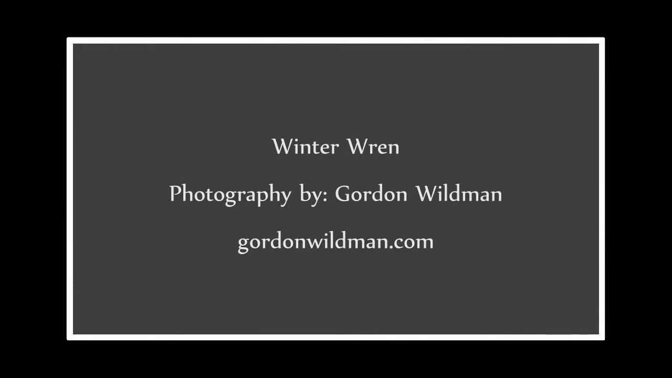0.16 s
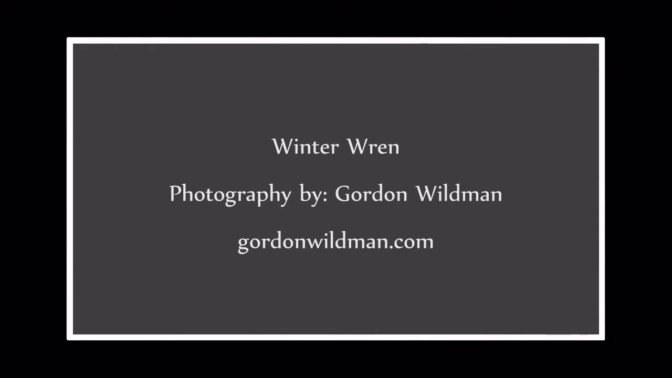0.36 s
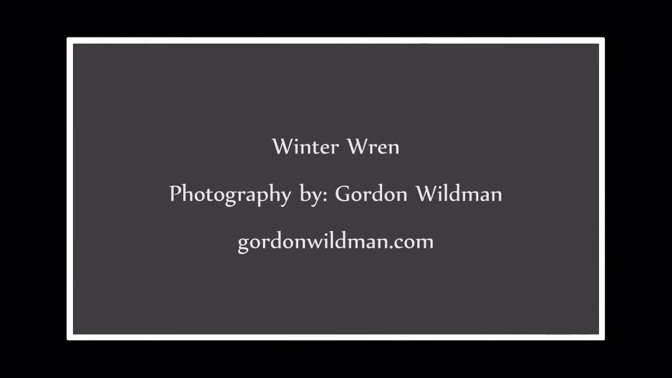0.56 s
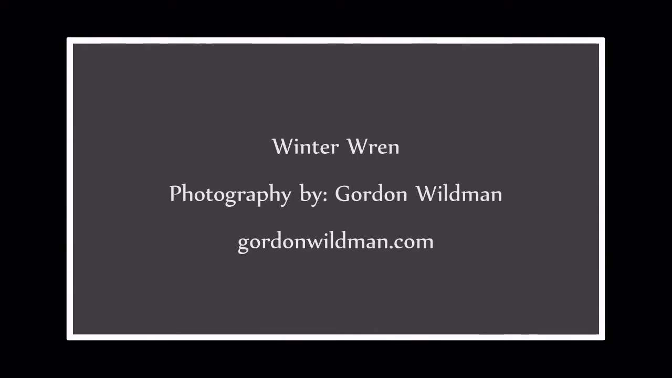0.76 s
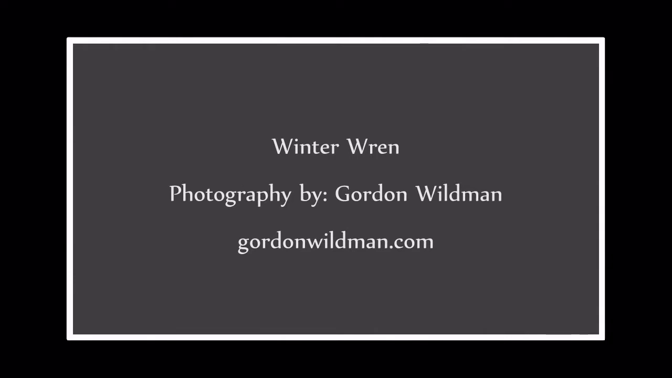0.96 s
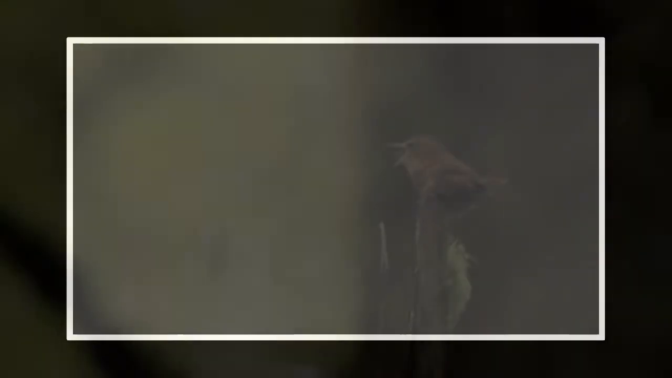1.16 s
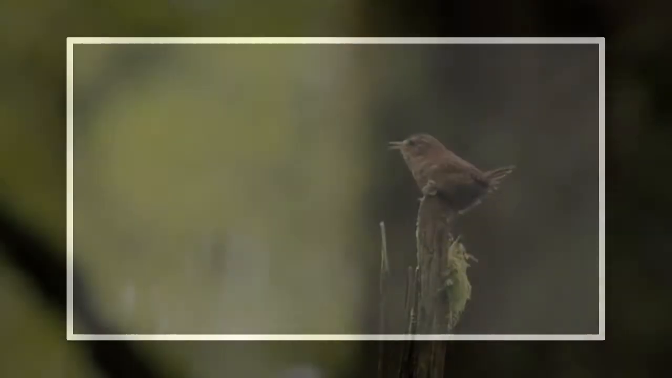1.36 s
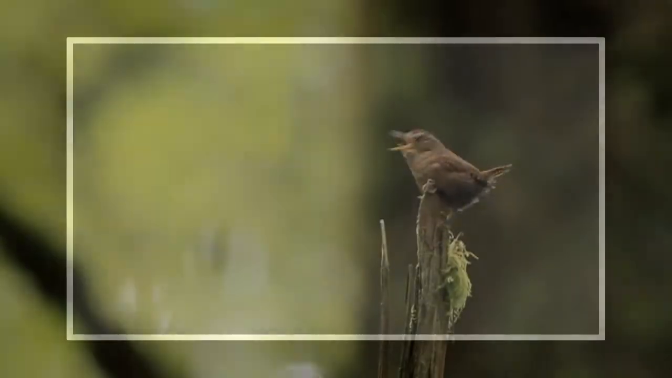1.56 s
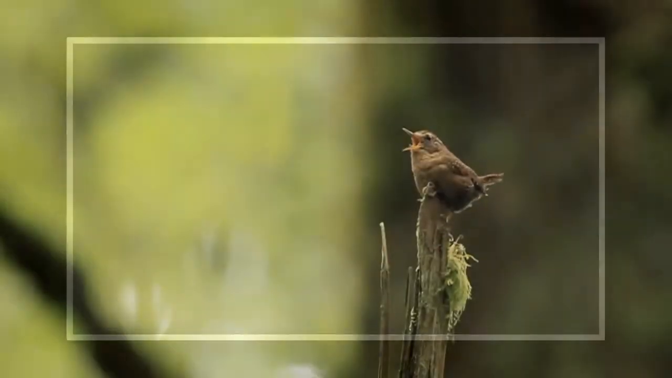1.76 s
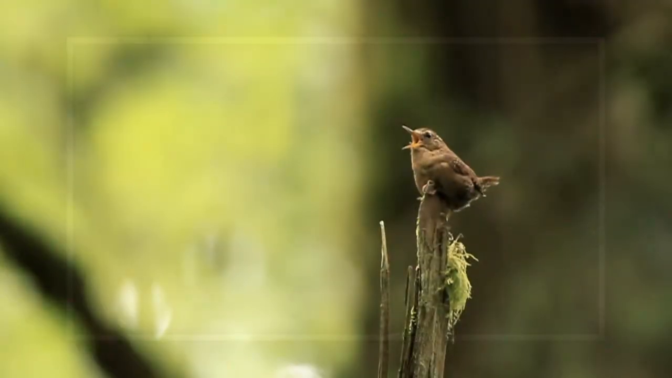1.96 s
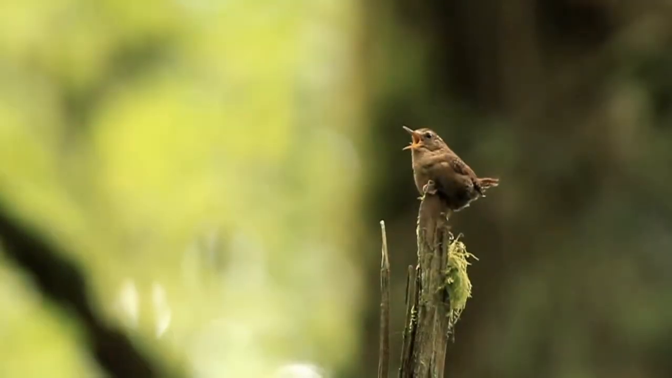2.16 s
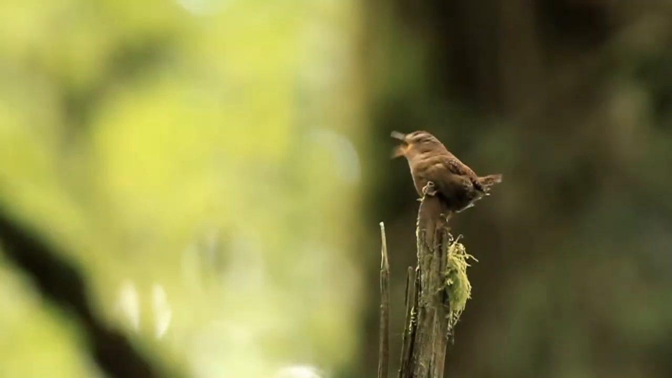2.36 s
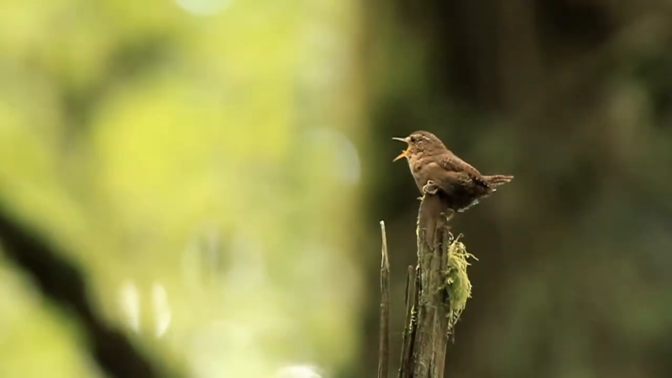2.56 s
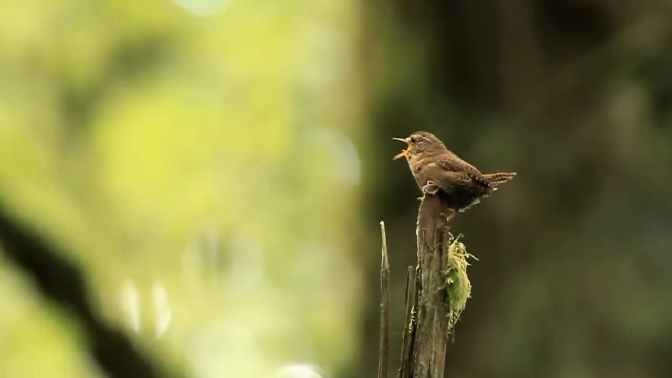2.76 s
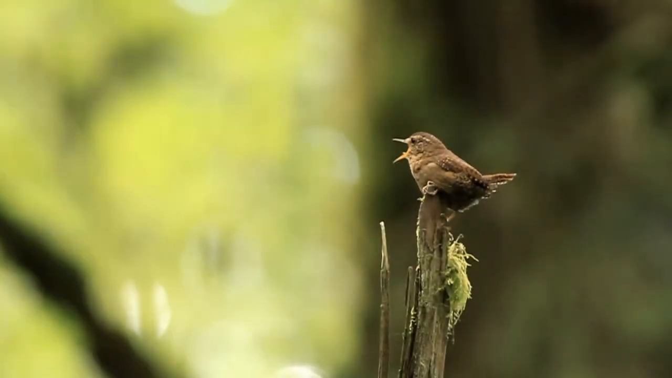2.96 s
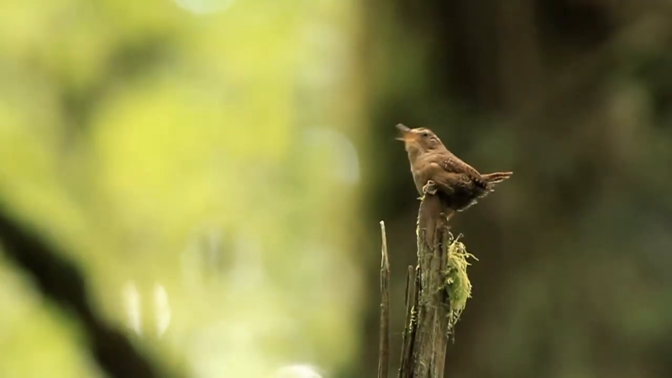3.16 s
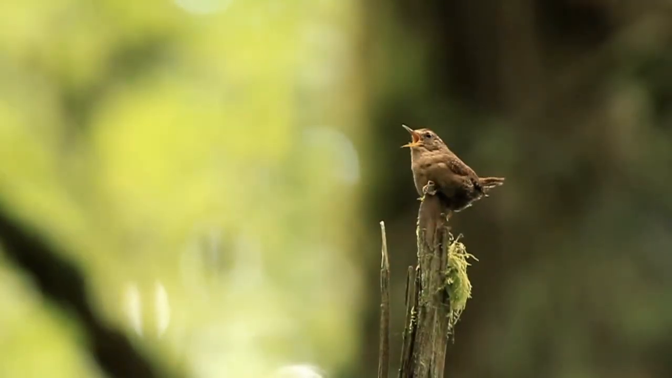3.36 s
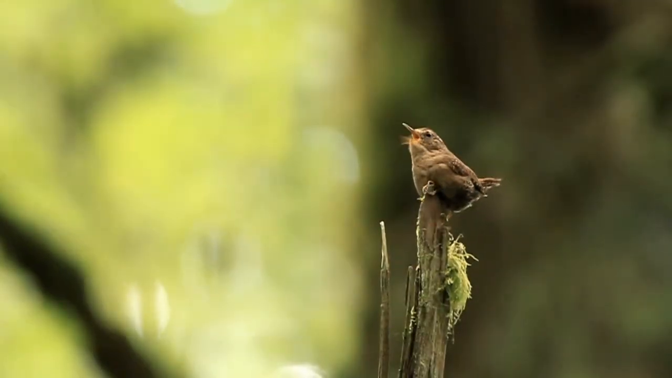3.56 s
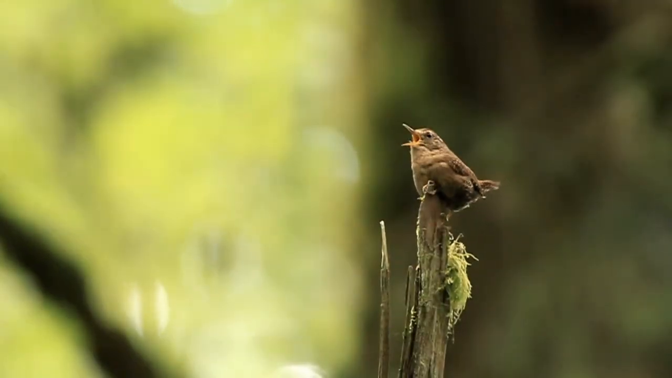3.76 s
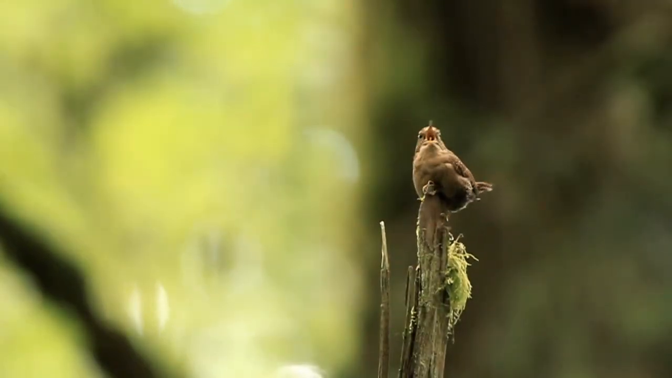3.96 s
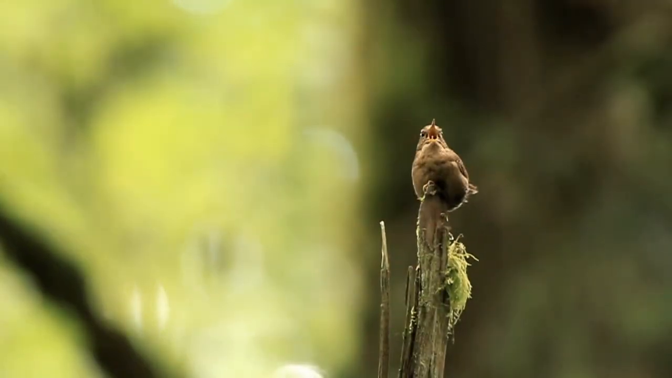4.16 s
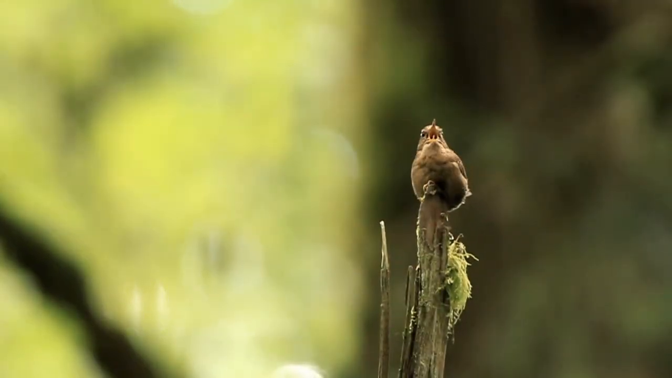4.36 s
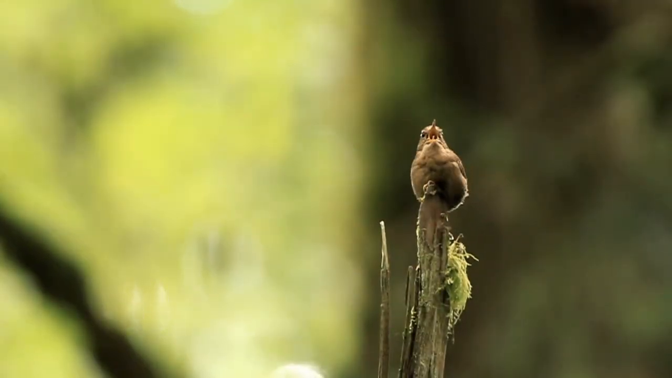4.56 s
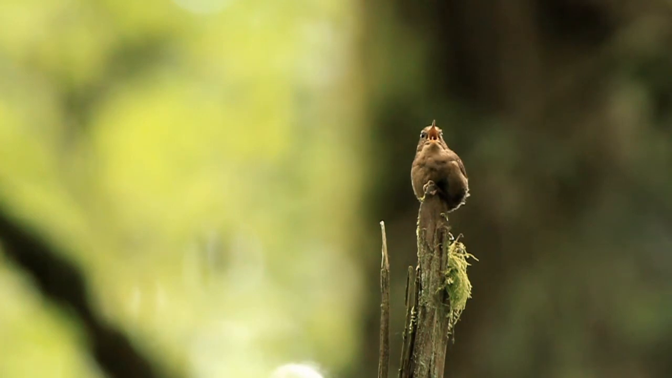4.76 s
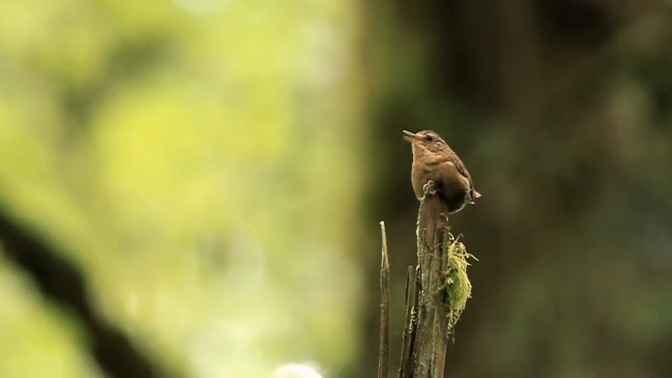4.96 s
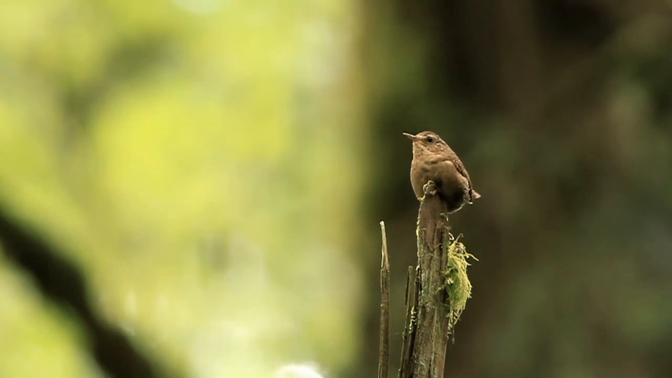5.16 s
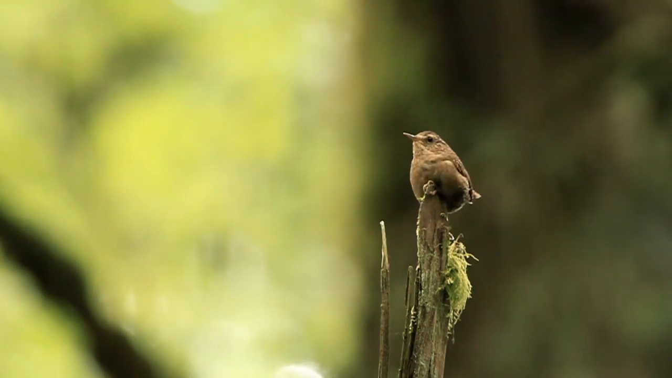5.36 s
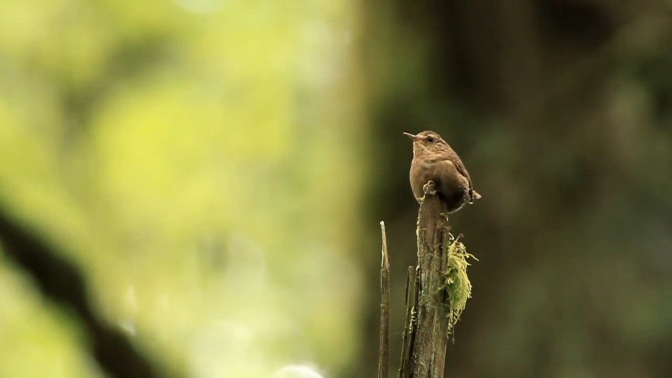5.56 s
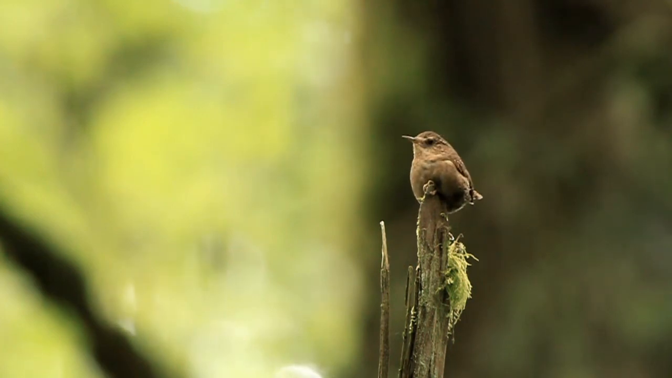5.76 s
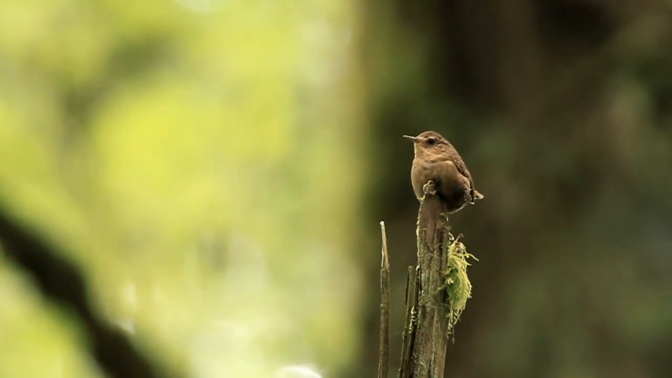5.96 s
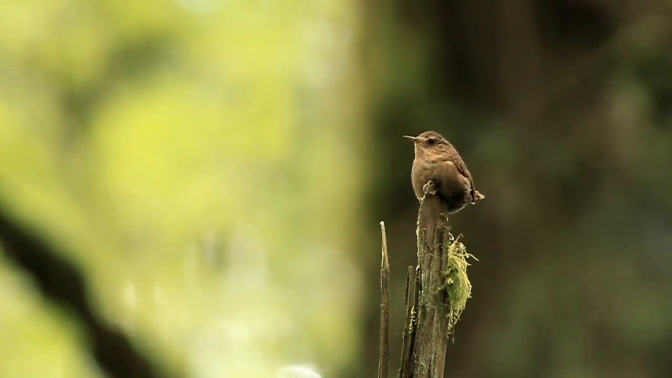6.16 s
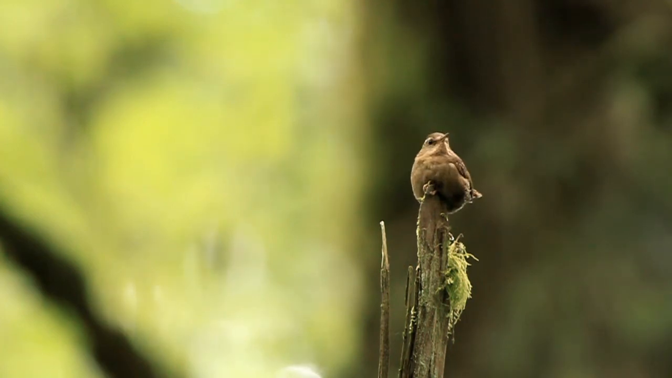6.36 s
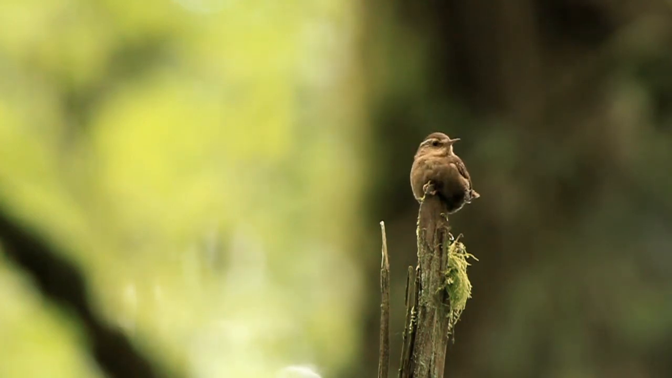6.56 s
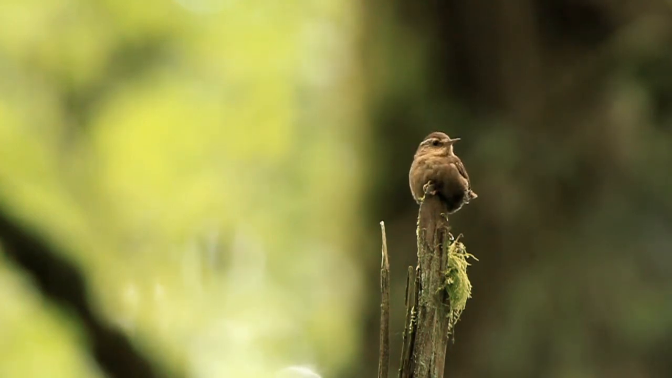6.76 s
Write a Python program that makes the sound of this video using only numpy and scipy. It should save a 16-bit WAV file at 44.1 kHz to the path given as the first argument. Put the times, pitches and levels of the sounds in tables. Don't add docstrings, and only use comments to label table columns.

```python
import sys
import numpy as np
from scipy import signal
from scipy.fft import rfft, irfft
from scipy.io import wavfile
from scipy.ndimage import uniform_filter1d, minimum_filter1d

SR = 44100
rng = np.random.default_rng(int(sys.argv[2]) if len(sys.argv) > 2 else 0)


def volts(x):
    e = np.asarray(x, float) / 20
    return 10 ** e


def transcribe(u):
    v = np.clip(np.atleast_2d(u).T, -1, 1)
    q = np.round(v * 32767).astype(np.int16)
    wavfile.write(sys.argv[1], SR, q)


N = 300071
CUT_S, TOP_HZ = .9878, 15780


def rms_one(x):
    return x / np.sqrt(np.mean(x ** 2) + 1e-20)


def band(x, low_hz, high_hz, order=2):
    return signal.sosfilt(signal.butter(order, [low_hz, high_hz], "band", fs=SR, output="sos"), x)


def drift(rate_hz):
    r = np.exp(-2 * np.pi * rate_hz / SR)
    noise = rng.standard_normal(N + 20000)
    return rms_one(signal.lfilter([1], [1, -2 * r, r * r], noise)[20000:])


# (f/Hz, level/dB)
LOW_TONES = [(86, -65.5), (129, -74.5)]


def held_offset():
    t = np.arange(N) / SR
    held = .1107 + sum(volts(db) * np.sin(2 * np.pi * hz * t) for hz, db in LOW_TONES)
    return held * [[0], [1]]


def joined(glides):
    notes = []
    for g in sorted(glides):
        last = notes[-1][-1] if notes else (0, 0, 0, 0, 0, 0)
        gap_s, leap_hz = g[0] - last[0] - last[1], abs(g[2] - last[4])
        turn = last[2] - last[4] > 1500 and g[4] - g[2] > 1500
        if gap_s < .0035 and leap_hz < 900 and not turn:
            notes[-1].append(g)
        else:
            notes.append([g])
    return notes


def breath_pulse(pitch, gain, note, fade_s):
    pad = int(0.00082 * SR)
    a = int(note[0][0] * SR) - pad
    b = int((note[-1][0] + note[-1][1]) * SR) + pad
    t = np.arange(a, b) / SR
    u = np.linspace(0, 1, 9)
    times = np.concatenate([s + u * length for s, length, *_ in note])
    bows = np.concatenate([f0 * (1 - u) * (1 - 2 * u) + 4 * f1 * u * (1 - u) + f2 * u * (2 * u - 1)
                           for _, _, f0, f1, f2, _ in note])
    level_db = np.interp(t, [s + length / 2 for s, length, *_ in note], [g[-1] for g in note])
    span_s = t[-1] - t[0]
    fade_out_s = min(fade_s, span_s / 2)
    swell_s = min(max(2.58 * fade_s, min(0.04 * span_s, .016)), span_s / 2)
    ramp = np.minimum((t - t[0]) / swell_s, (t[-1] - t) / fade_out_s)
    ends = np.sin(np.pi / 2 * np.clip(ramp, 0, 1)) ** 2
    line = np.interp(t, np.maximum.accumulate(times), bows)
    pitch[a:b] = uniform_filter1d(line, size=70, mode="nearest")
    gain[a:b] = np.maximum(gain[a:b], volts(level_db) * ends)


def whistle(notes, fade_s, second_db, third_db, flutter_db, waver_hz, loss_db):
    pitch, gain = np.full((2, N), 5000.), np.zeros((2, N))
    for k, note in enumerate(sorted(notes)):
        breath_pulse(pitch[k % 2], gain[k % 2], note, fade_s)
    phase = 2 * np.pi * np.cumsum(pitch + waver_hz * drift(147), axis=1) / SR
    ragged = volts(3.7 * drift(300))

    def overtone(k, db):
        growth = volts(1.6 * (k * pitch - 13000) / 1000)
        below_top = np.clip((TOP_HZ + 150 - k * pitch) / 250, 0, 1)
        return volts(db) * ragged * below_top * growth * np.sin(k * phase)

    throat_loss = volts(loss_db * np.minimum(pitch - 4300, 0) / 1000)
    tone = np.sin(phase) * throat_loss + overtone(2, second_db) + overtone(3, third_db)
    return (gain * tone).sum(axis=0) * volts(flutter_db * drift(120))


def wren():
    notes = joined(free_glides() + plunges() + trills() + end_figures()) + buzzes()
    return whistle(notes, fade_s=0.0029, second_db=-32.0, third_db=-45, flutter_db=1.4,
                   waver_hz=26.5, loss_db=2.5)


# (t/s, length/s, f/Hz, level/dB)
HOLDS = [(1.062, 0.0062, 6080, -16.5), (1.3382, 0.022, 3205, -21), (1.3772, 0.0055, 3520, -17.5),
         (2.36, 0.039, 7072, -16), (2.399, 0.013, 7500, -22.5), (1.052, .004, 6050, -21),
         (1.105, 0.007, 6800, -12.5), (1.116, 0.0069, 7900, -24), (3.371, 0.011, 7620, -12),
         (4.162, 0.009, 7440, -23), (1.427, 0.016, 6200, -11.5), (1.512, 0.018, 3890, -20.5),
         (2.817, 0.037, 7840, -15.5), (3.073, 0.015, 4100, -17), (4.037, .009, 6525, -22),
         (4.117, 0.0097, 7640, -12.5)]
# (t/s, length/s, start f/Hz, end f/Hz, level/dB)
RISES = [(1.113, 0.0089, 6830, 7850, -22), (1.227, 0.0087, 6740, 7490, -18),
         (1.407, 0.028, 5180, 6150, -16.5), (1.443, 0.013, 6240, 7440, -18), (1.473, 0.01, 6065, 7200, -33),
         (1.5443, 0.022, 4520, 5610, -15.5), (1.6005, 0.0068, 3900, 4800, -19),
         (2.264, 0.024, 4010, 4650, -12), (2.286, .009, 4636, 4745, -12),
         (1.8525, 0.014, 7600, 7910, -11.5), (2.923, 0.011, 6400, 7700, -23.5),
         (2.802, 0.014, 7200, 7820, -22), (2.851, 0.013, 7830, 8260, -22.5),
         (3.0345, 0.0051, 3990, 4800, -19), (2.945, 0.0069, 5666, 7170, -14),
         (2.972, 0.012, 6280, 7300, -19), (3.1995, 0.0079, 5150, 5780, -15.5),
         (3.277, .017, 5350, 5500, -40), (3.2086, 0.015, 5780, 6790, -9.5),
         (3.330, 0.0115, 6480, 8460, -23), (3.5766, 0.012, 4533, 5270, -12.5),
         (3.6095, 0.016, 6250, 8970, -19), (3.649, 0.011, 7320, 7720, -18),
         (4.0365, 0.0045, 5000, 6560, -14), (4.101, 0.021, 6630, 7620, -12)]
FALLS = [(.935, 0.031, 8300, 6850, -13), (1.5655, 0.0042, 5250, 3940, -17.5),
         (1.574, .005, 5056, 3680, -13), (1.5835, 0.0049, 4090, 3040, -19.5),
         (1.593, 0.00425, 4373, 3350, -23), (.982, 0.012, 8100, 7460, -23.5),
         (.9965, 0.014, 7250, 5980, -19), (1.0115, 0.017, 5850, 4170, -15.5),
         (1.795, 0.012, 7600, 6930, -12), (1.8085, 0.0065, 6950, 4920, -15),
         (1.8835, 0.029, 8640, 7330, -14.5), (1.127, 0.015, 7850, 6250, -16.5),
         (1.145, 0.022, 6250, 4200, -14), (1.235, 0.0063, 7450, 6800, -18.5),
         (1.2828, 0.016, 6710, 5300, -15), (1.2998, 0.0128, 5285, 4316, -16),
         (1.455, 0.00954, 7416, 6895, -20.5), (1.465, 0.007, 6690, 5660, -16.5),
         (1.607, 0.00806, 4740, 4600, -16.5), (1.642, 0.0055, 8570, 7900, -19),
         (2.2187, 0.01195, 4198, 3748, -14), (2.295, 0.02, 4800, 4220, -14),
         (2.412, 0.013, 7460, 6370, -17), (2.9385, 0.0055, 7600, 5650, -15),
         (2.96, 0.0097, 7230, 6510, -15.5), (2.985, 0.028, 7280, 6550, -19),
         (3.038, 0.014, 4770, 3830, -20.5), (3.089, 0.0094, 4060, 3330, -22),
              (3.066, 0.0035, 4950, 4130, -20), (3.114, 0.013, 4190, 3400, -20.5),
              (3.154, 0.023, 3840, 3390, -25.5), (3.2235, 0.02, 6760, 4650, -12.5),
              (3.306, 0.0038, 6280, 5450, -16), (3.34, 0.013, 8450, 6920, -13.5),
              (3.404, .008, 4480, 4330, -25), (3.413, 0.008, 4330, 3800, -13.5),
              (3.548, 0.017, 4850, 4060, -10.5), (3.571, 0.00401, 4080, 3500, -19),
              (3.5414, 0.003, 5310, 4080, -14), (3.63, 0.015, 9050, 7380, -16),
              (3.6726, 0.0031, 7850, 6800, -18), (4.049, 0.0097, 6464, 5280, -7),
              (4.059, 0.014, 5340, 4580, -17), (4.13, 0.018, 7510, 6060, -16.5),
              (4.166, 0.011, 7150, 6420, -17.5)]
ARCHES = [(1.090, 0.01176, 7050, 6900, -19.5), (1.188, 0.0076, 5890, 6270, -17.5),
          (1.199, 0.0076, 6320, 6520, -19.5), (1.8185, 0.01, 4650, 7450, -8),
          (2.355, 0.0038, 5850, 6910, -19), (2.4711, 0.0059, 5620, 5360, -14.5),
          (1.778, 0.010, 4800, 7860, -15), (1.789, 0.0056, 7730, 7710, -21),
          (2.867, 0.031, 8120, 6367, -20), (3.0575, 0.011, 4100, 4870, -10.5),
          (3.1312, 0.009, 3510, 4790, -16), (3.1404, 0.0089, 4670, 3900, -15.5),
          (3.263, 0.011, 5165, 5300, -13), (3.2956, 0.0067, 5420, 6250, -13.5),
          (3.535, 0.0038, 4040, 5300, -12), (3.5392, 0.0038, 5280, 5190, -8.5),
          (3.6605, 0.016, 7440, 7900, -10)]
CUPS = [(1.2429, 0.017, 6950, 8360, -21.5), (1.2604, .0224, 8436, 6740, -18.5),
        (1.363, 0.011, 3050, 3154, -28), (1.495, 0.015, 4815, 3950, -16), (1.6485, .015, 7790, 8600, -15.5),
        (1.665, .005, 8600, 8430, -16.5), (1.864, .017, 7910, 8460, -19.5), (2.232, 0.017, 3798, 3740, -21),
        (2.4472, .026, 5280, 5530, -15), (3.2457, .017, 4597, 5105, -16.5),
        (3.3545, .018, 7010, 7390, -18.5)]


def free_glides():
    glides = [(s, length, hz, hz, hz, db) for s, length, hz, db in HOLDS]
    shapes = ((RISES, 39.2), (FALLS, 72.7), (ARCHES, 311), (CUPS, -300))
    for rows, bow_hz in shapes:
        glides += [(s, length, f0, (f0 + f1) / 2 + bow_hz, f1, db) for s, length, f0, f1, db in rows]
    return glides


# (echo level/dB, t60 of lows/s, t60 of highs/s)
WOOD = [
    (-12.5, 0.1, 0.063),
    (-12.5, 0.99, 0.55),
]


def wood(x):
    t = np.arange(SR) / SR
    clumps_db = 2.5 * rng.standard_normal(SR // 100).repeat(100)
    trunks = rng.standard_normal(SR) * volts(clumps_db)
    trunks = rms_one(signal.sosfilt(signal.butter(1, 12000, fs=SR, output="sos"), trunks))
    lows = signal.sosfiltfilt(signal.butter(2, 5500, fs=SR, output="sos"), trunks)
    highs = trunks - lows

    def dying(t60_s):
        return np.sqrt(2 * np.log(1000) / (t60_s * SR)) * volts(-60 * t / t60_s)

    echoes = sum(volts(db) * (lows * dying(low_s) + highs * dying(high_s)) for db, low_s, high_s in WOOD)
    return signal.fftconvolve(x, echoes * np.clip(t / 0.0013, 0, 1))[:N]


# (f/Hz, level/dB per Hz)
AIR = [(15, -44), (30, -12.5), (190, -3.5), (600, -9), (2400, -10.5), (4200, -15.5), (7000, -24),
       (13000, -27)]
# (t/s, depth/dB)
DUCKS = [(2.295, 4), (3.55, 0.5), (4.06, 2), (4.797, 1), (5.8, 1.5)]


def air():
    hz = np.clip(np.fft.rfftfreq(N, 1 / SR), 10, 12600)
    points_hz, points_db = np.transpose(AIR)
    shape_db = np.interp(np.log(hz), np.log(points_hz), points_db)
    hiss = irfft(rfft(rng.standard_normal(N)) * volts(shape_db), N)
    t, recovery_s = np.arange(N) / SR, 0.35
    ducked_db = sum(db * (t > s) * np.exp(-np.abs(t - s) / recovery_s) for s, db in DUCKS)
    return rms_one(hiss) * volts(-44.5 - ducked_db + .5 * drift(13.0))


# (t/s, level/dB)
SWELLS = [(1.1, -42), (2.93, -43), (3.48, -40), (4.4, -52), (5.321, -46), (5.9, -38), (6.1, -42),
          (6.3, -39.5), (6.55, -55)]


def rumble():
    t, swell_s = np.arange(N) / SR, 0.066
    level = volts(-50) + sum(volts(db) * np.exp(-.5 * ((t - s) / swell_s) ** 2) for s, db in SWELLS)
    return rms_one(band(rng.standard_normal(N), 130, 231)) * level * volts(-14.0 + 2.0 * drift(2.4))


# (t/s, peak level/dB)
TICKS = [
    (1.0104, -22),
    (3.009, -24.5),
    (5.756, -22),
    (6.324, -42),
]
# (f/Hz, level/dB, t60/s)
TWIG = [(1500, -14, .002), (5200, -4, .004), (6400, -5, .002), (8000, -4, .002), (9600, -5, .002),
        (11400, -4, .002)]


def twig():
    click, out = np.zeros(N), 0
    for s, db in TICKS:
        click[int(s * SR)] = volts(db)
    for hz, db, t60_s in TWIG:
        r, w = volts(-60 / (t60_s * SR)), 2 * np.pi * hz / SR
        ring = [0, volts(db) * np.sin(w)], [1, -2 * r * np.cos(w), r * r]
        out = out + signal.lfilter(*ring, click + 1e-18)
    return band(out, 630, 12000, order=4)


# (t/s, end t/s, start f/Hz, end f/Hz, fall/Hz, chirps per s, sounding share, level/dB,
# level change to the end/dB)
BUZZES = [
    (1.666, 1.756, 7822, 7410, 750, 201, 1.15, -17.5, -8),
    (3.4223, 3.506, 4165, 5005, 900, 177, 0.42, -19.5, 0),
]


def buzzes():
    notes = []
    for s, end, f0, f1, fall, rate, share, db, fade_db in BUZZES:
        uneven = rng.normal(0, 1, (30, 3))
        for at, (jump, loud, late) in zip(np.arange(s, end, 1 / rate), uneven):
            mid = np.interp(at, [s, end], [f0, f1]) + 90 * jump
            at = at + .04 * late / rate
            level_db = db + fade_db * ((at - s) / (end - s) - .5) + 2.0 * loud
            notes.append([(at, share / rate, mid + 0.42 * fall, mid + 0.132 * fall,
                           mid - 0.84 * fall, level_db)])
    return notes


# (offset t/s, length/s, start f/Hz, middle f/Hz, end f/Hz, level/dB)
PLUNGE = [(-.0275, 0.012, 5500, 7300, 7900, -13), (-.0175, 0.0083, 8110, 7865, 8410, -25),
          (-.0085, 0.0053, 7860, 6940, 5920, -13), (.0002, .012, 4550, 6374, 7460, -10),
          (0.032, 0.0238, 7520, 7770, 7890, -12), (0.053, 0.0119, 7880, 8250, 8290, -20.5),
          (0.068, 0.025, 8400, 7800, 6690, -13.5)]
# (t/s, level/dB, pitch factor, stretch)
PLUNGE_AT = [(1.960, -1, 1.01, 0.98), (2.102, -2, 1.0, 0.97)]


def plunges():
    return [(s + stretch * dt, stretch * length, k * f0, k * f1, k * f2, db + level)
            for s, db, k, stretch in PLUNGE_AT for dt, length, f0, f1, f2, level in PLUNGE]


# (offset t/s, length/s, start f/Hz, middle f/Hz, end f/Hz, level/dB)
THIN_TRILL = [(.003, 0.004, 3908, 5075, 6100, -20), (.007, 0.0031, 6120, 6480, 6450, -19),
              (.010, 0.004, 6450, 6100, 5400, -17), (.017, 0.017, 8116, 7887, 6800, -23)]
ARCH_TRILL = [(.004, 0.0072, 4700, 6505, 7000, -10.5), (.011, 0.006, 7000, 6850, 7440, -17.5),
              (.017, .005, 7300, 6500, 5185, -14.5), (.027, 0.0098, 8225, 7775, 7550, -15.5)]
LAST_TRILL = [(.041, 0.016, 8930, 8145, 8370, -20), (.060, .020, 8010, 8810, 8304, -27.5),
              (.080, 0.017, 8250, 8000, 7700, -18.5), (.097, .0075, 7700, 7450, 6840, -25)]
# (t/s, level/dB, pitch factor)
THIN_AT = [(2.4941, 0.82, 0.92), (2.5371, 1.2, 0.95), (2.5775, 1.46, 0.91), (2.62, -0.062, 0.92),
           (2.664, -0.78, 0.93), (2.7057, 0.39, 0.92), (2.749, -1, 0.9)]
ARCH_AT = [(3.6903, 0.42, 1.0), (3.7401, -1, 0.99), (3.789, 0.28, 0.98), (3.8362, -0.33, 1),
           (3.884, 0.65, 1), (3.934, 0.67, 0.98), (3.9822, 0.092, 0.97)]
LAST_AT = [(4.2015, 1.82, 0.99), (4.324, 2.4, 0.98), (4.4452, 1.7, 0.99), (4.5637, 2.4, 1.0),
           (4.6876, 1.4, 0.98), (4.809, 0.24, 0.97)]


def trills():
    glides = []
    for figure, repeats in ((THIN_TRILL, THIN_AT), (ARCH_TRILL, ARCH_AT), (LAST_TRILL, LAST_AT)):
        glides += [(s + dt, length, k * f0, k * f1, k * f2, db + level)
                   for s, db, k in repeats for dt, length, f0, f1, f2, level in figure]
    return glides


# (t/s, end t/s, whirr level/dB)
MOTOR_RUNS = [(3.02, 3.48, -55), (4.40, 4.81, -55), (6.37, 6.9, -54.5)]
# (f/Hz, level/dB)
MOTOR_LINES = [
    [(2261, -66), (2342, -62.5), (2923, -66.5)],
    [(1954, -62), (2929, -69), (3149, -68), (3375, -63)],
    [(1938, -69), (2200, -68), (2590, -67), (2805, -68), (2995, -65), (3035, -66), (3230, -66), (3749, -64),
     (5609, -77), (5841, -76)],
]


def motor():
    t, out = np.arange(N) / SR, np.zeros(N)
    whirr = rms_one(band(rng.standard_normal(N), 1800, 3700))
    for (s, end, db), lines in zip(MOTOR_RUNS, MOTOR_LINES):
        on = np.clip(np.minimum(t - s, end - t) / 0.0078, 0, 1)
        hum = sum(volts(level + 8.5) * np.sin(2 * np.pi * hz * t) for hz, level in lines)
        hum = hum * volts(1.2 * drift(12))
        kick = 1 + 1.6 * np.exp(-np.maximum(t - s, 0) / 0.058)
        out += on * (volts(db) * kick * whirr + hum)
    return out


# (t/s, level/dB, top f/Hz)
LEADS = [(4.206, -22, 7390), (4.329, -12, 7440), (4.447, -15.5, 7490), (4.5673, -16.5, 7560),
         (4.692, -23, 7970), (4.814, -15.5, 7690)]
# (t of bottom/s, bottom f/Hz, fall start f/Hz, fall level/dB, rise level/dB)
DIPS = [(4.2302, 3900, 6890, -18, -10.5), (4.353, 4070, 6680, -20, -8), (4.472, 4070, 7090, -15.5, -11),
        (4.591, 4215, 7240, -18.5, -11), (4.718, 4425, 7590, -19, -13), (4.837, 4650, 7810, -17, -11.5)]


def end_figures():
    glides = []
    for s, db, top in LEADS:
        glides += [(s, .008, top - 2600, top - 750, top, db),
                   (s + 0.009, .003, top, top - 100, top - 700, db - 10.0)]
    for s, low, high, fall_db, rise_db in DIPS:
        glides += [(s - .006, .005, high, (high + low) / 2 + 300, low + 50, fall_db - 0.5),
                   (s + 0.00089, .008, low + 150, low / 2 + 4250, 7500, rise_db)]
    return glides


# (t/s, length/s, start f/Hz, middle f/Hz, end f/Hz, level/dB)
FAR_BIRD = [
    (5.07, .042, 2420, 2800, 2950, -44.5),
    (5.112, .016, 3000, 3350, 2750, -43.5),
    (5.2, .045, 2400, 2250, 2080, -54),
    (5.255, .048, 2010, 1990, 1960, -45),
]


def far_bird():
    return whistle(joined(FAR_BIRD), fade_s=.008, second_db=-40, third_db=-50, flutter_db=2.5,
                   waver_hz=80, loss_db=0)


def scene():
    near = wren() + twig() + far_bird()
    return np.tile(near + wood(near) + air() + rumble() + motor(), (2, 1))


def capsule(x):
    peak = uniform_filter1d(-minimum_filter1d(-np.abs(x[0]), size=88), size=88)
    x = x / (1 + peak ** 4) ** .25
    bent = volts(-33.0) * band(x ** 2, 10600, 19000, order=5)
    loudness = np.sqrt(uniform_filter1d(x[0] ** 2, size=1024) + 1e-12)
    grit = volts(-39.5) * loudness * rms_one(band(rng.standard_normal(N), 8100, 15400, order=5))
    return x + bent + grit


def drop_bands(x):
    _, _, z = signal.stft(x, SR, nperseg=1408)
    power = np.abs(z[:, :704].reshape(2, 88, 8, -1)) ** 2
    power = power.sum(axis=2).mean(axis=0)
    level = 10 * np.log10(uniform_filter1d(power, size=3, axis=0) + 1e-20)
    khz = (np.arange(88)[:, None] + .5) * SR / 176000
    mask_db, slope_db_per_khz = -30.5, -5.5
    tilt = slope_db_per_khz * khz
    mask = np.maximum.accumulate(level - tilt, axis=0) + tilt + mask_db
    keep = (level > mask + rng.normal(0, 1.5, level.shape[1])) | (khz < 8.5)
    above = np.maximum.accumulate(np.where(khz < 15.8, level, -200)[::-1], axis=0)[::-1]
    floor_db = -64 + 5.5 * (khz - 15)
    keep &= (khz * 1000 < 13100) | (uniform_filter1d(above, size=3, axis=1) > floor_db)
    z[:, :704] *= keep.repeat(8, axis=0)
    return signal.istft(z, SR, nperseg=1408)[1][:, :N]


def side_noise(x):
    _, _, z = signal.stft(x, SR, nperseg=2048)
    edges = np.geomspace(110, 740, 19).astype(int)
    out, chance = np.zeros_like(z), rng.random((18, z.shape[1]))
    wide = rng.random(z.shape[1]) < .035
    for low, high, draw in zip(edges, edges[1:], chance):
        size = np.sqrt(np.mean(np.abs(z[low:high]) ** 2, axis=0))
        on = (draw < .045) | (wide & (high > 190) & (high < 400))
        out[low:high] = on * size ** 0.99 * volts(-31 + 18 * (low > 400))
    out = out * np.exp(2j * np.pi * rng.random(z.shape))
    return signal.istft(out, SR, nperseg=2048)[1][:N]


def band_limit(x):
    return signal.sosfilt(signal.butter(12, 15910, fs=SR, output="sos"), x)


def record(dry):
    sound = drop_bands(capsule(dry))
    sound = sound + side_noise(sound[0]) * [[1], [-1]]
    mix = np.where(np.arange(N) / SR < CUT_S, held_offset(), sound)
    mix = signal.sosfiltfilt(signal.ellip(10, .1, 40, TOP_HZ, fs=SR, output="sos"), mix)
    return band_limit(mix)


dry = scene()
out = record(dry)
transcribe(out)
```